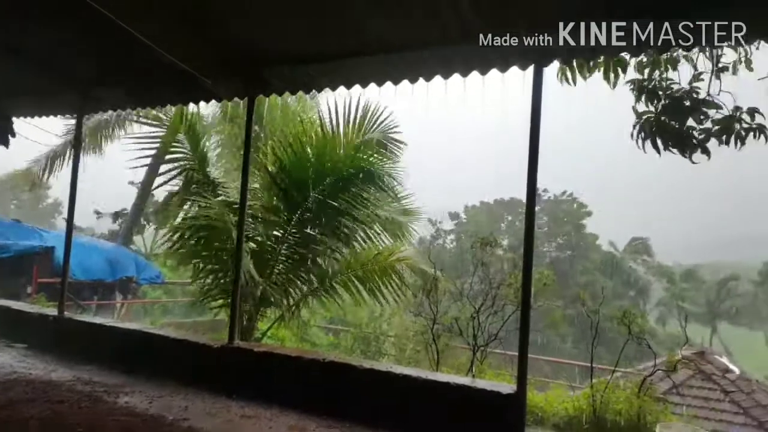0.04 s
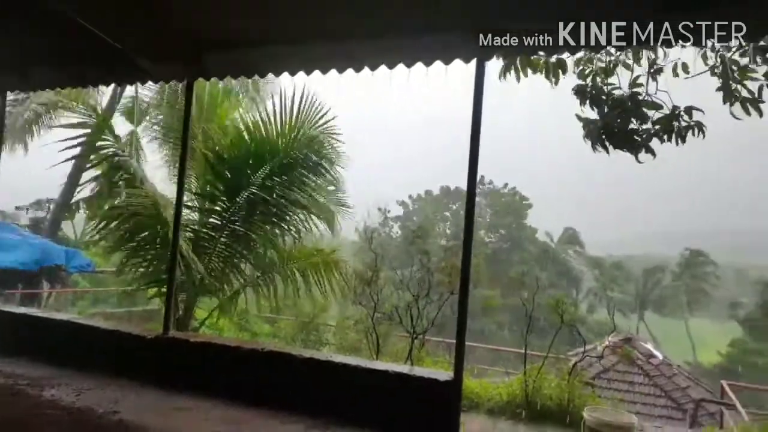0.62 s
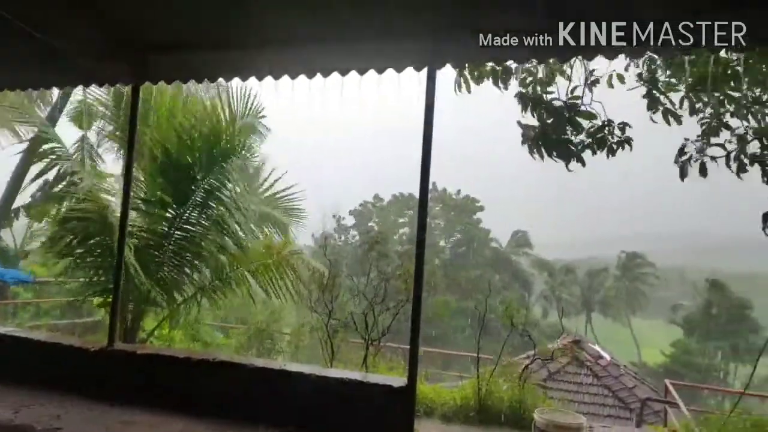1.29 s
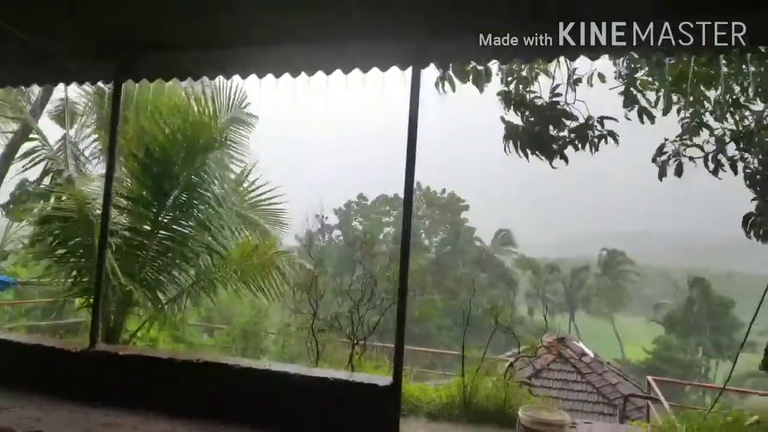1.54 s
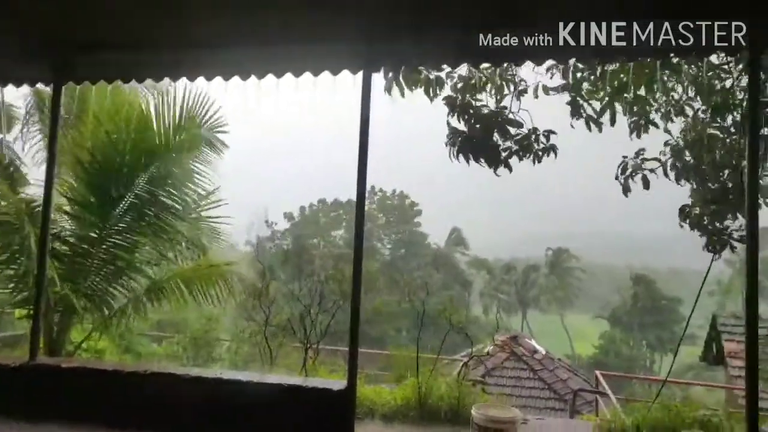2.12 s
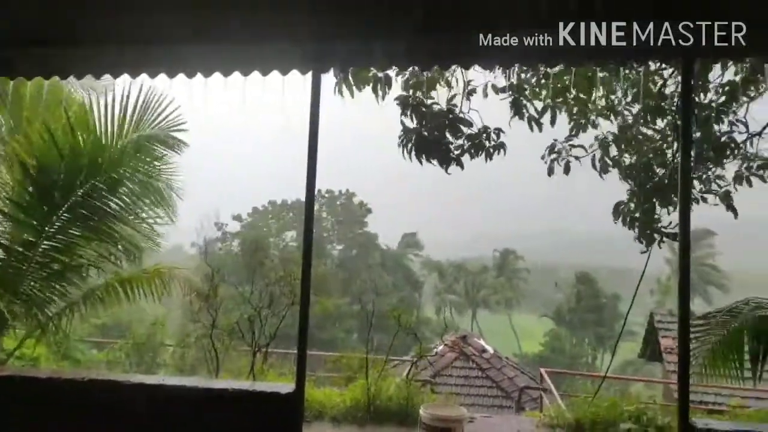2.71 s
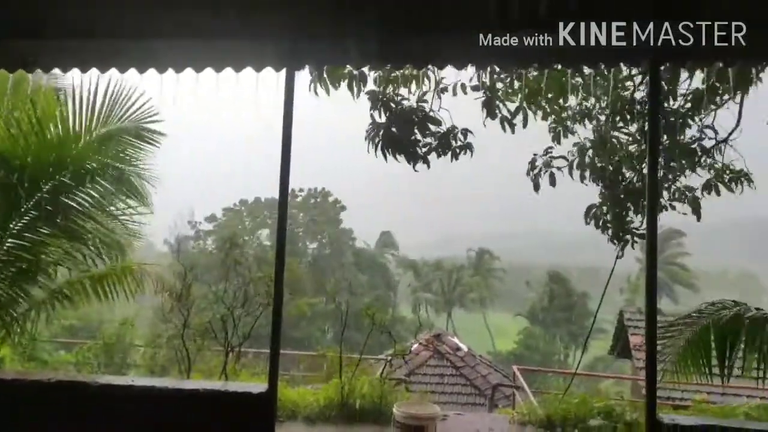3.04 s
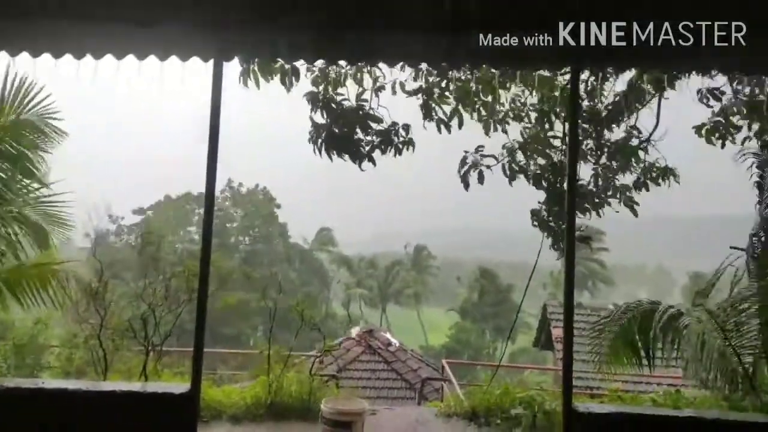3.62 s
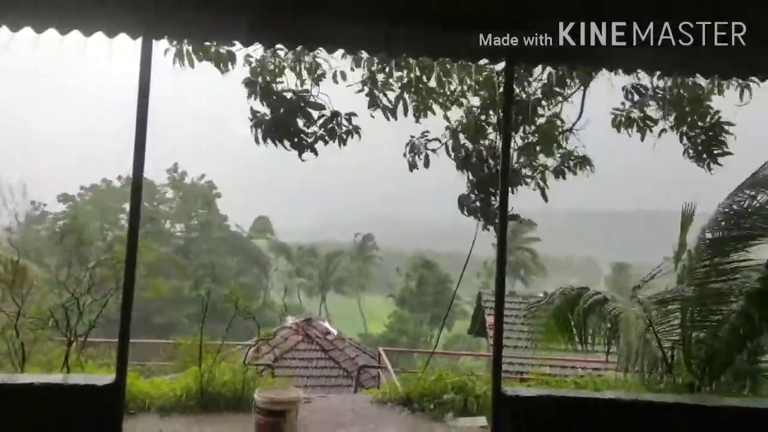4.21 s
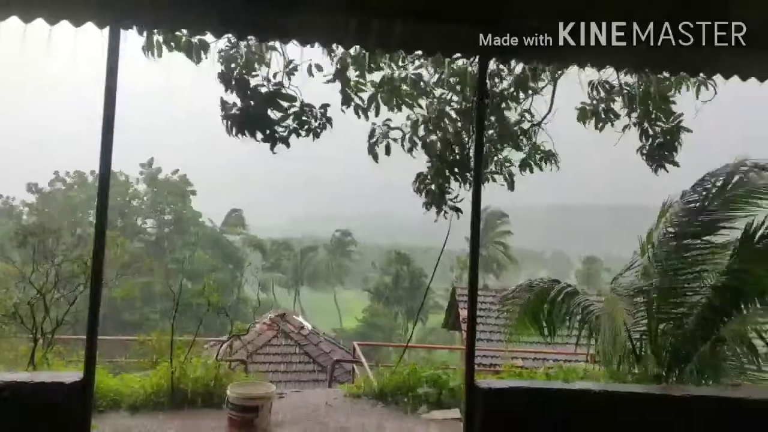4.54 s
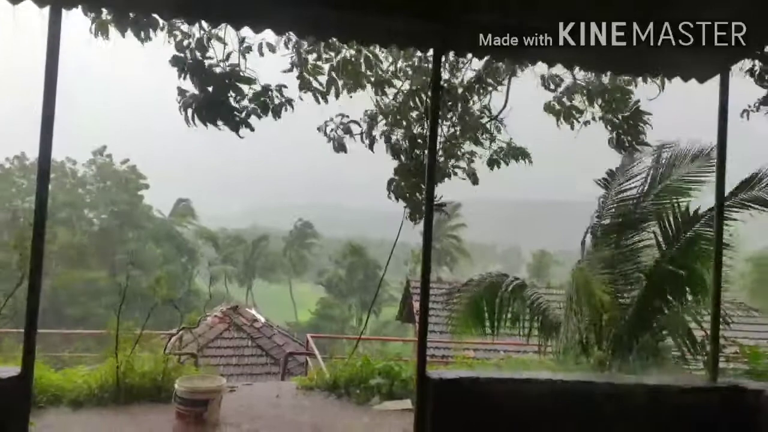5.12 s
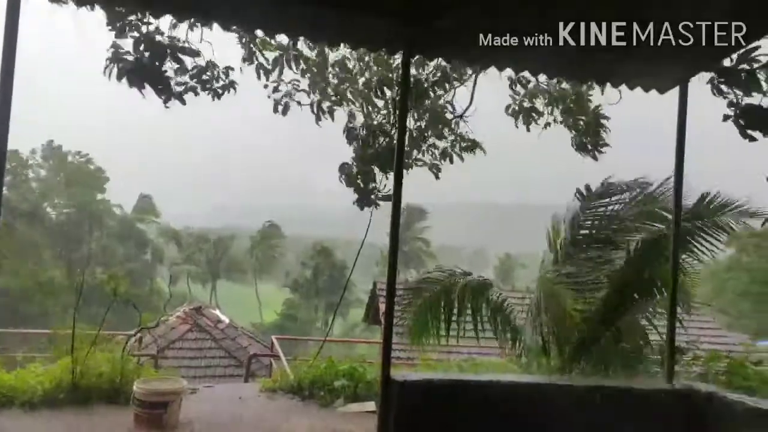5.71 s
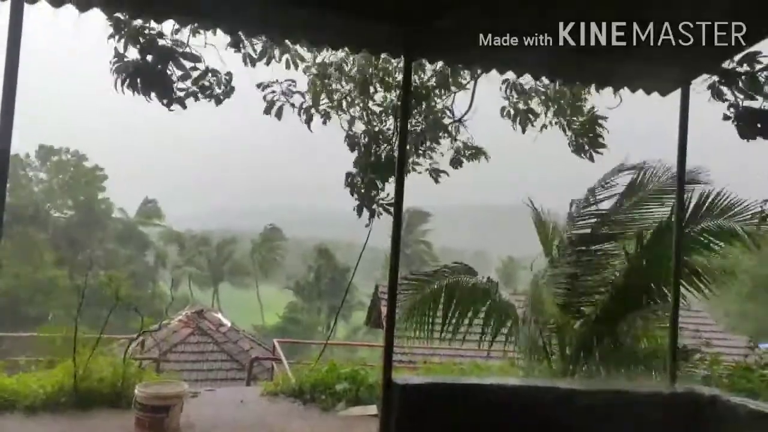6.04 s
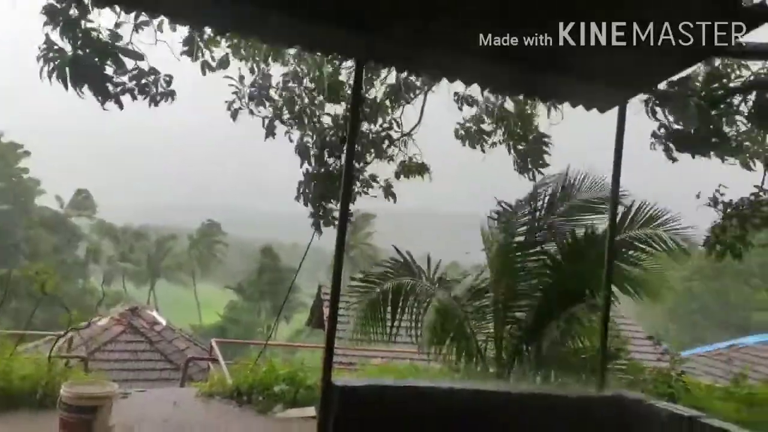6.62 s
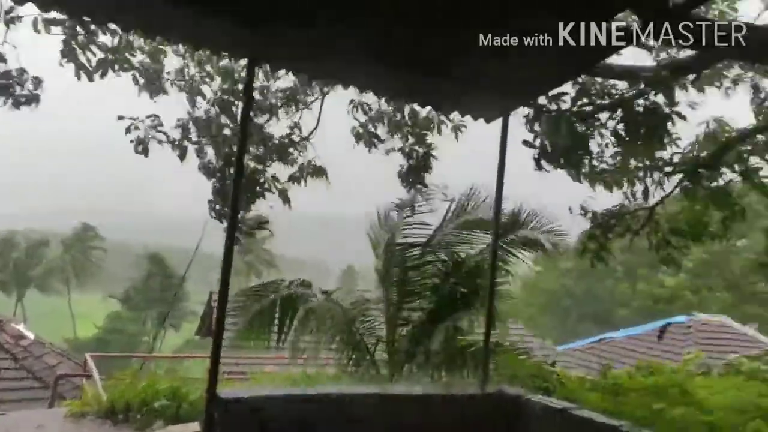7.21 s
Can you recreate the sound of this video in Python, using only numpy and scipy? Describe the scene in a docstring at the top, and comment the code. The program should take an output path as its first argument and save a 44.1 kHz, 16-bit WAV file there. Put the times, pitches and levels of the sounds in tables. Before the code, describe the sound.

Gusts slap and rumble against the microphone, shifting between left and right, over a constant tropical downpour heard from under a roof. As the wind drops, splashes from the eaves and a few fat drips on the roof come through the hiss. Lighter gusts return in the middle and toward the end, with close wet ticks, short swells of rain overhead and faint drumming on nearby tiles.

```python
"""Monsoon downpour from a covered veranda

Countless drops on palms and wet ground merge into a hiss, with a few hard ticks close to the mic.
Run-off from the eaves splatters on the paving, blown sheets of rain and fat drips hit the roof,
and tiles drum a little way off, over the dull roar of the valley.
Wind buffets each of the two microphone ports in its own way: rumble, slaps, thumps and pops."""
import sys
import numpy as np
from scipy import signal
from scipy.fft import rfft, irfft, next_fast_len
from scipy.io import wavfile
from scipy.ndimage import uniform_filter1d, map_coordinates

SR = 44100
rng = np.random.default_rng(int(sys.argv[2]) if len(sys.argv) > 2 else 0)


def to_wav(sig):
    """Store sig (one row per channel, or 1-D mono) as 16-bit WAV at the path in sys.argv[1].

    Samples outside -1..1 are clipped; the rate is SR.
    """
    pcm = np.clip(np.atleast_2d(sig), -1, 1) * 32767
    pcm = np.round(pcm).astype(np.int16)
    wavfile.write(sys.argv[1], SR, pcm.T)  # frames by channels


N = 330309
TOP_HZ = 15600
LEFT, RIGHT = -1, 1  # the side of a microphone port
# spectrum of water bursting on a hard surface near the mic: f/Hz, level/dB
SPLASH_SPECTRUM = [(600, -19), (2000, 2), (3800, 10), (5500, 15), (9500, 8), (12500, 15), (15500, -1)]


def downpour():
    """Rain all around: patter on foliage, finer spray on the ground, nearby ticks, the far valley's roar."""
    # strength of the rain: t/s, relative level on leaves/dB, relative level on the ground/dB
    strength = [(0, -26.5, -28), (1.3, -28, -28), (2.9, -28, -27.5), (4.3, -27, -27.5), (4.7, -28.5, -25),
                (5.8, -27, -26), (7.49, -28, -25)]
    # spectra of rain on leaves, on wet ground and far away: f/Hz, level/dB
    leaf_spectrum = [(300, -22), (600, -11), (800, -10.5), (1200, -9.5), (1800, -6.5), (2600, -3),
                     (3400, -2), (4200, -2.5), (4800, -3), (5500, -10), (8000, -6), (15000, -15)]
    spray_spectrum = [(1500, -22.5), (4000, -4.5), (5700, -6), (7000, -4.5), (8000, -5), (9000, -2.5),
                      (10500, -3.5), (12500, -7.5), (15500, -12.5)]
    roar_spectrum = [(20, 16.5), (60, 11.5), (150, 4), (330, 3.5), (450, -0.5), (720, -1), (1100, -11),
                     (2500, -33)]
    leaves_db, spray_db = curves(strength)
    leaf_drops = impacts(count=7000, pitch_hz=2975, cycles=5.8, spread_db=1.5)
    leaves = coloured(shower(leaf_drops, share=0.22, patchy_db=2.8), leaf_spectrum)
    ground_drops = impacts(count=11000, pitch_hz=8400, cycles=2.7, spread_db=2)
    spray = coloured(shower(ground_drops, share=0.08, patchy_db=2.6), spray_spectrum)
    leaves *= amp(leaves_db + 2 + 0.57 * wobble(30))
    spray *= amp(spray_db + 4 + 0.5 * wobble(55))
    close_drops = impacts(count=300, pitch_hz=5230, cycles=3, spread_db=3)
    ticks = amp(spray_db - 14) * coloured(close_drops, spray_spectrum)
    # long waves reach both ports nearly alike; the roar grows with the patter
    roar = coloured(rng.standard_normal(N) + 0.12 * rng.standard_normal((2, N)), roar_spectrum)
    return leaves + spray + ticks + amp(-37 + leaves_db - leaves_db.mean()) * roar


def buffet(side, flutter_db):
    """Wind on one port: deep rumble, flutter that grows more steeply with the wind, slaps, thumps, pops."""
    # hard eddies slapping a port: t/s, level/dB, side
    hard_eddies = [(0.047, -10, -1), (.092, -15, -1), (0.171, -10, -1), (0.202, -11.5, -1),
                   (0.279, -22, -1), (.57, -17, 1), (0.662, -18.5, -1), (.765, -21, -1), (.912, -19, 1),
                   (1.07, -21, -1), (1.09, -18, 1), (1.112, -10, -1), (1.415, -12.5, 1), (1.485, -20, -1),
                   (1.52, -15, -1), (1.556, -15, 1), (1.585, -19, -1), (1.614, -11, -1), (1.64, -22, 1),
                   (1.705, -22, -1), (3.93, -23, 1), (4.055, -20.5, 1), (4.105, -18, 1), (4.303, -17, 1),
                   (5.946, -24.5, 1), (6.28, -22.5, -1), (6.43, -23, 1)]
    # spectra of the turbulence at the port: f/Hz, level/dB
    rumble_spectrum = [(8, -10.5), (22, 6), (45, -1), (90, -6.5), (140, -13.5), (250, -29.5), (500, -85),
                       (1500, -91)]
    flutter_spectrum = [(30, -6.5), (90, -9.5), (150, -2.5), (250, -10), (450, -20), (800, -29.5),
                        (1500, -33.5), (4000, -56)]
    slap_spectrum = [(40, -13), (100, 6.5), (200, 3), (350, -3), (550, -10.5), (900, -21), (1500, -40),
                     (4000, -47)]
    wind_db = gusts(side)
    churn = wobble(32)
    rumble = unit(steady_noise(rumble_spectrum) * amp(2.3 * churn)) * amp(wind_db + 6)
    flutter = unit(steady_noise(flutter_spectrum) * amp(2.5 * churn + 1.2 * wobble(90)))
    flutter *= amp(1.33 * wind_db + flutter_db)
    slap_gain = sum(swell(s, db, half_s=0.016) for s, db, port in hard_eddies if port == side)
    slaps = slap_gain * steady_noise(slap_spectrum)
    return rumble + flutter + slaps + thumps(side) + pops(side)


def gusts(side):
    """Wind level at one port in dB: each gust swells and fades, adding its power to the breeze."""
    # gusts reaching the mic: t/s, left level/dB, right level/dB, half duration/s
    blows = [(0.04, -16, -20.5, 0.28), (0.31, -16.5, -24, 0.15), (0.495, -16, -41, 0.037),
             (0.605, -26, -17, 0.057), (0.713, -21.5, -26.5, 0.18), (0.922, -24, -20, 0.045),
             (1.045, -33, -15, 0.049), (1.153, -16.5, -23, 0.12), (1.307, -33, -24.5, 0.12),
             (1.404, -24, -12, 0.03), (1.546, -18, -19, 0.12), (1.732, -22, -24.5, 0.12),
             (2.036, -34.5, -35, 0.11), (2.353, -42, -27.5, 0.051), (2.503, -48, -31.5, 0.065),
             (2.793, -38, -25, 0.033), (2.925, -49, -30.5, 0.064), (3.35, -48, -33.5, 0.046),
             (3.697, -53, -30.5, 0.2), (3.934, -46, -25.5, 0.11), (4.107, -38, -23.5, 0.079),
             (4.213, -35, -20.5, 0.023), (4.298, -42, -22, 0.056), (5.462, -44, -29.5, 0.059),
             (5.708, -42, -34, 0.086), (5.83, -23, -39, 0.053), (5.956, -25.5, -21.5, 0.066),
             (6.095, -29, -45.5, 0.069), (6.365, -26, -27, 0.21), (6.54, -29.5, -32, 0.26),
             (7.298, -34, -32.5, 0.25)]
    breeze_db, skirt = -50.5, 0.97  # a skirt of 1 is a plain bell; more gives longer flanks
    t = clock()[::100]
    power = amp(breeze_db) ** 2
    for s, left_db, right_db, half_s in blows:
        bell = np.exp(-np.abs((t - s) / half_s) ** (2 / skirt))
        power = power + (amp(left_db if side == LEFT else right_db) * bell) ** 2
    return np.interp(clock(), t, 10 * np.log10(power))


def thumps(side):
    """A large eddy hits the port with a dull thump: one push inside a weaker, longer suction."""
    # large eddies: t/s, level/dB, half duration/s, side
    eddies = [(.043, 1, 0.0042, 1), (0.608, 0, 0.0054, 1), (0.712, 5.5, 0.0026, -1),
              (0.767, -2, 0.0023, -1), (0.937, 3.5, 0.0026, 1), (1.009, 1.5, 0.0025, 1),
              (1.401, 1, 0.0021, 1), (1.423, -3, 0.0057, 1), (1.535, 0, 0.0028, 1), (1.712, 6, 0.0017, -1),
              (3.92, -0.5, 0.0052, 1), (3.975, -6.5, 0.0066, 1), (4.122, -3, 0.0018, 1),
              (4.296, -3, 0.0026, 1), (4.32, 0, 0.0034, 1), (5.824, -4.5, 0.0017, -1),
              (6.323, -0.5, 0.0058, 1), (6.424, -1.5, 0.0026, 1)]
    rebound = 3  # the suction is this many times longer and weaker
    push = lambda u: (1 + u ** 2) ** -1.5
    out = np.zeros(N)
    for s, db, half_s, port in eddies:
        if port == side:
            u = (clock() - s) / half_s
            out += amp(db) * (push(u) - push(u / rebound) / rebound)
    return out


def pops(side):
    """The strongest eddies collapse at the port: the pressure sags, snaps across and settles."""
    # pressure steps: t/s, level/dB, side
    steps = [(.208, -10, -1), (.564, -13, 1), (1.118, -5, -1), (1.41, -15, 1), (1.611, -10, -1),
             (4.112, -17, 1), (4.306, -16, 1)]
    settle_s = 0.0009
    out = np.zeros(N)
    for s, db, port in steps:
        if port == side:
            u = (clock() - s) / settle_s
            out += amp(db) * np.tanh(10 * u) * np.exp(-np.abs(u))
    return out


def rasps():
    """In the hardest gusts the air tears across a port in short, rough bursts."""
    # bursts of torn air: t/s, level/dB
    bursts = [(.197, -18.5), (1.114, -25), (1.612, -34)]
    # their spectrum: f/Hz, level/dB
    spectrum = [(300, -14), (800, -1), (1300, -16), (2200, -1), (5000, -17)]
    gain = sum(swell(s, db, half_s=0.0081) for s, db in bursts)
    return gain * coloured(rng.standard_normal(N), spectrum)


def runoff():
    """Each gush from the eaves bursts on the paving into a splatter that dies away."""
    # gushes landing: t/s, level/dB
    gushes = [(.941, -23), (2.122, -21.5), (3.095, -25), (3.222, -23), (3.39, -21), (4.37, -29),
              (4.605, -24), (4.93, -24), (5.036, -21), (5.385, -21), (6.016, -19), (6.343, -22),
              (6.41, -22), (7.283, -39)]
    attack_s, decay_s = 0.004, 0.056
    age = np.arange(SR // 4) / SR
    burst = (1 - np.exp(-age / attack_s)) * np.exp(-age / decay_s)
    power = np.zeros(N + SR)
    for s, db in gushes:
        power[int(s * SR):][:len(age)] += (amp(db) * burst) ** 2
    drops = impacts(count=11000, pitch_hz=8100, cycles=2.6, spread_db=1.5)
    return np.sqrt(power[:N]) * coloured(shower(drops, share=0.25, patchy_db=-4.5), SPLASH_SPECTRUM)


def near_drops():
    """Single drops strike close to the mic, a little to the left: hard wet ticks with a very short ring."""
    # close hits: t/s, level/dB, ring f/Hz
    hits = [(.9432, -17, 9700), (2.125, -15, 10700), (4.5595, -14, 11700), (4.6006, -7.5, 9400),
            (5.0408, -14.5, 4000), (5.2453, -17, 7400), (5.3589, -12.5, 10100), (6.3493, -16, 5250),
            (7.1176, -16.5, 9650), (7.2333, -15.5, 7150), (7.2886, -13, 10800), (7.388, -13.5, 9650)]
    left_bias_db = 3
    crack = 0.7 * coloured(rng.standard_normal((2, N)), SPLASH_SPECTRUM)
    ticks = 0
    for s, db, hz in hits:
        ring = np.sin(2 * np.pi * hz * clock())
        ticks = ticks + strike(s, db, decay_s=0.00045) * (ring + crack)
    return ticks * amp(left_bias_db * np.array([[0.5], [-0.5]]))


def roof_sheets():
    """Blown sheets of rain swell and fade as a rattle on the roof overhead."""
    # sheets landing: t/s, level/dB, half duration/s
    sheets = [(0.228, -26, 0.025), (1.44, -29, 0.03), (2.158, -27, 0.027), (3.85, -34, 0.087),
              (4.778, -25.5, 0.031), (5.746, -34, 0.25), (6.542, -23.5, 0.076), (6.785, -23, 0.11)]
    # spectrum of the struck roof: f/Hz, level/dB
    spectrum = [(250, -18), (700, -16), (1400, -18.5), (2100, -8), (2900, -4.5), (4200, -3), (6000, -16),
                (12000, -28)]
    drops = impacts(count=7000, pitch_hz=3000, cycles=3.7, spread_db=2)
    rattle = shower(drops, share=0.21, patchy_db=-1)
    return sum(swell(*sheet) for sheet in sheets) * coloured(rattle, spectrum)


def drips():
    """Fat drips from the trees land on the roof with a short, hollow splat."""
    # splats: t/s, level/dB, centre f/Hz, decay/s
    splats = [(3.239, -28, 1600, 0.0052), (3.837, -31, 1700, 0.0043), (4.516, -35, 1700, 0.004),
              (4.536, -22, 2950, 0.0096), (4.558, -22, 2750, 0.0094)]
    width = 0.53  # bandwidth over centre frequency
    out = 0
    for s, db, centre_hz, decay_s in splats:
        band = lambda hz: 1 / (1 + (np.log((hz + 1) / centre_hz) / (width / 2)) ** 2)
        splat = unit(filtered(rng.standard_normal((2, N)), band))
        out = out + strike(s, db, decay_s) * splat
    return out


def tiles():
    """Drops drum hollowly on the neighbouring roof tiles, a little way off."""
    # slow waves of drumming: t/s, level/dB, half duration/s
    waves = [(.7, -43, .7), (3.15, -45.5, 0.29), (6.754, -39, 0.41), (7.35, -41, 0.37)]
    # spectrum of the struck tiles: f/Hz, level/dB
    spectrum = [(200, -8.5), (600, -11), (720, 0.5), (820, 3.5), (950, 0), (1150, 1), (1500, 0),
                (3000, -32)]
    floor_db = -45.5
    drops = impacts(count=4000, pitch_hz=1100, cycles=0.64, spread_db=2.5)
    patter = shower(drops, share=0.2, patchy_db=2)
    power = amp(floor_db) ** 2 + sum(swell(*wave) ** 2 for wave in waves)
    return np.sqrt(power) * coloured(patter, spectrum)


def impacts(count, pitch_hz, cycles, spread_db):
    """Drops of scattered size and pitch, each a tiny damped ring with its own delay between the ports."""
    t = np.arange(64) / SR
    hz = np.clip(pitch_hz * np.exp(0.5 * rng.standard_normal((count, 1))), 600, TOP_HZ)
    size = amp(spread_db * np.minimum(rng.exponential(size=(count, 1)), 3.5))
    rings = size * np.sqrt(hz) * np.sin(2 * np.pi * hz * t) * np.exp(-t * hz / cycles)
    at_left = rng.integers(0, N, (count, 1)) + np.arange(len(t))
    at_right = at_left + rng.integers(-19, 20, (count, 1))
    pair = np.array([np.bincount((at % N).ravel(), rings.ravel(), N) for at in (at_left, at_right)])
    # all pitches equally strong: the surface that is hit sets the colour
    power = np.mean(np.abs(rfft(rings)) ** 2, axis=0)
    bins_hz = np.fft.rfftfreq(len(t), 1 / SR)
    return unit(filtered(pair, lambda f: np.interp(f, bins_hz, power) ** -0.5))


def shower(drops, share, patchy_db):
    """Distinct drops take a share of the power, the wash the rest."""
    return np.sqrt(share) * drops + np.sqrt(1 - share) * wash(patchy_db)


def wash(patchy_db):
    """Stereo noise of merged drops, grained by small, brief patches of random strength."""
    spectra = signal.stft(rng.standard_normal((2, N)), nperseg=512)[2]
    patches = uniform_filter1d(rng.standard_normal(spectra.shape[1:]), size=5, axis=0)
    patches = unit(uniform_filter1d(patches, size=5, axis=1))
    return unit(signal.istft(spectra * amp(patchy_db * patches), nperseg=512)[1][:, :N])


def steady_noise(spectrum):
    """Coloured noise with fast roughness but an even strength."""
    noise = coloured(rng.standard_normal(N), spectrum)
    return noise / np.sqrt(np.abs(uniform_filter1d(noise ** 2, size=1800)) + 1e-9)


def swell(s, db, half_s):
    """A smooth rise and fall of gain around time s."""
    gain = np.zeros(N)
    near = np.arange(max(int((s - 4 * half_s) * SR), 0), min(int((s + 4 * half_s) * SR), N))
    gain[near] = amp(db) * np.exp(-((near / SR - s) / half_s) ** 2)
    return gain


def strike(s, db, decay_s):
    """The gain of one hit: a quick rise to its peak, then a decay."""
    u = np.clip((clock() - s) / decay_s, 0, 50)
    return amp(db) * u * np.exp(1 - u)


def wobble(rate):
    """A smooth random curve with rate knots a second."""
    knots = rng.standard_normal(4096)
    coarse_s = np.arange(0, N / SR, 0.002)
    return np.interp(clock(), coarse_s, map_coordinates(knots, [coarse_s * rate], mode="wrap"))


def coloured(x, spectrum):
    """x shaped by a spectrum, at rms 1."""
    return unit(filtered(x, lambda hz: amp(along(spectrum, hz))))


def filtered(x, response):
    """x through a gain that depends on frequency."""
    size = next_fast_len(N + SR // 2)
    return irfft(rfft(x, size) * response(np.fft.rfftfreq(size, 1 / SR)), size)[..., :N]


def along(points, hz):
    """Rows of f/Hz, level/dB read on a log frequency axis."""
    f, db = np.transpose(points)
    return np.interp(np.log(hz + 1), np.log(f + 1), db)


def curves(rows):
    """One value per sample for each column after the time."""
    s, *columns = np.transpose(rows)
    return [np.interp(clock(), s, column) for column in columns]


def clock():
    """The time of every sample."""
    return np.arange(N) / SR


def amp(db):
    """Decibels to gain."""
    return 10 ** (np.asarray(db) / 20)


def unit(x):
    """Scale to rms 1."""
    return x / np.sqrt(np.mean(x ** 2) + 1e-20)


def scene():
    """Rain all around the veranda, wind right on the microphone ports."""
    # the mic's left side faces more dripping foliage: f/Hz, left minus right level/dB
    balance = [(700, -0.5), (2000, 0), (3000, 1), (4200, 3.5), (6000, 1), (10000, 1.5), (15000, 1)]
    rain = downpour() + runoff() + roof_sheets() + drips() + tiles()
    rain = filtered(rain, lambda hz: amp(np.outer([0.5, -0.5], along(balance, hz))))
    left_wind = buffet(LEFT, flutter_db=4.5) + rasps()
    right_wind = buffet(RIGHT, flutter_db=-1.5)
    return rain + near_drops() + np.array([left_wind, right_wind])


def record(dry):
    """The strongest gusts are rounded off at full scale; nothing passes above the band limit."""
    limited = dry / (1 + np.abs(dry) ** 6) ** (1 / 6)
    return filtered(limited, lambda hz: hz < TOP_HZ)


dry = scene()
out = record(dry)
to_wav(out)
```